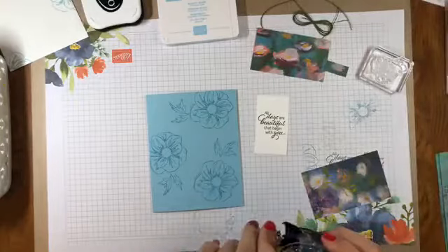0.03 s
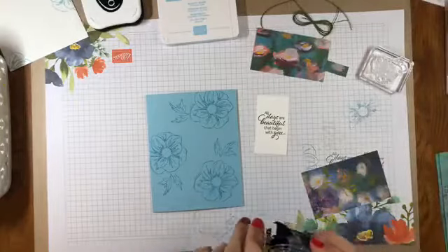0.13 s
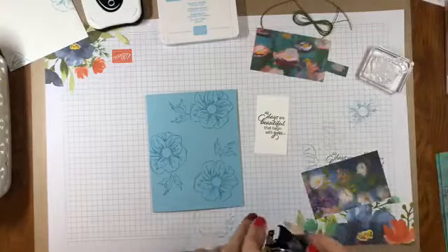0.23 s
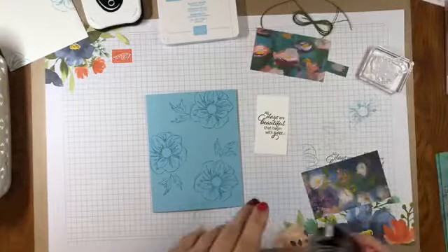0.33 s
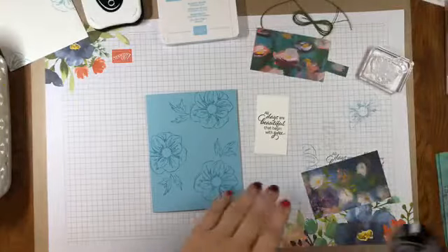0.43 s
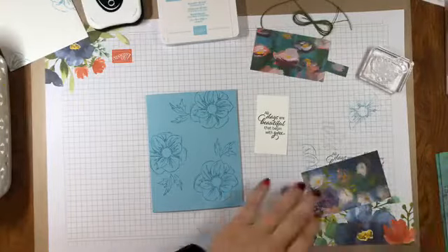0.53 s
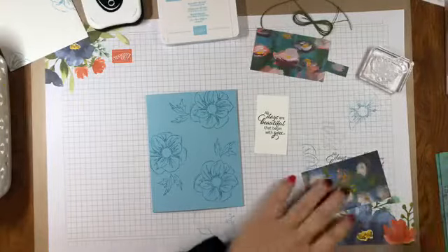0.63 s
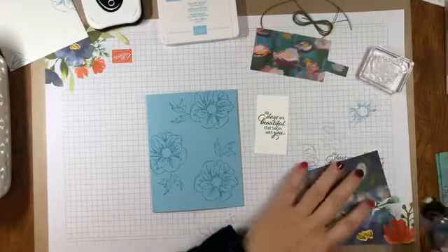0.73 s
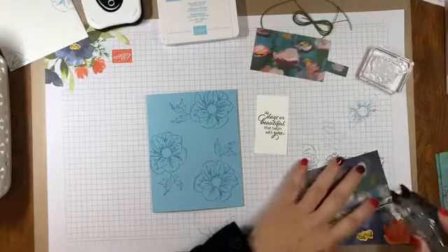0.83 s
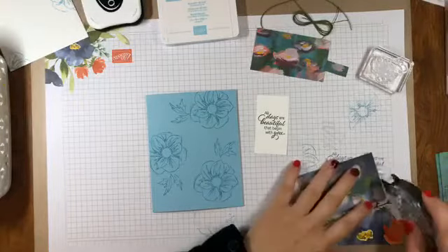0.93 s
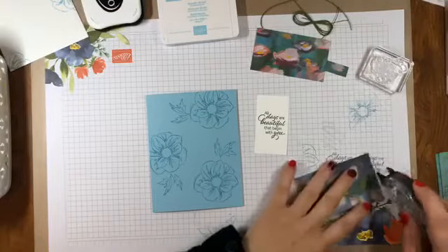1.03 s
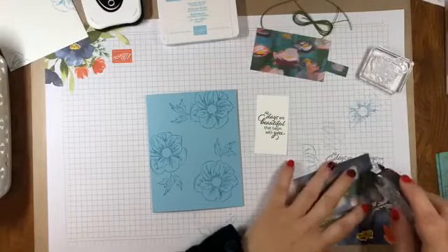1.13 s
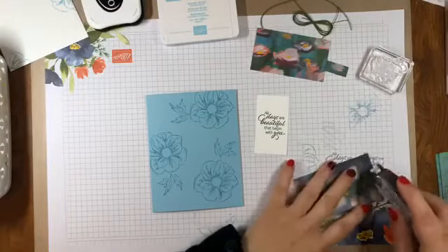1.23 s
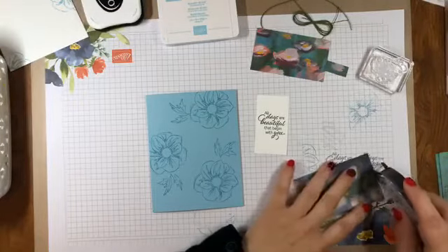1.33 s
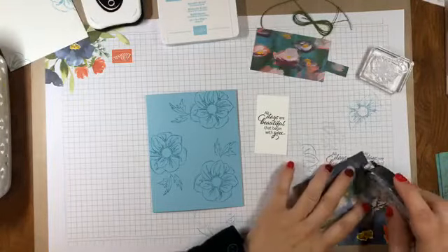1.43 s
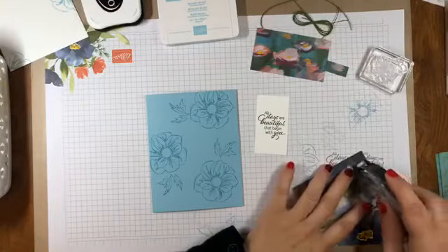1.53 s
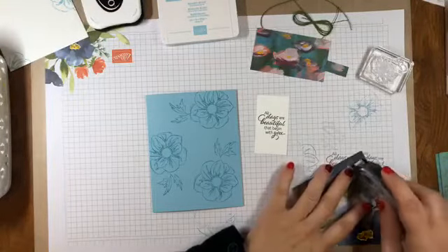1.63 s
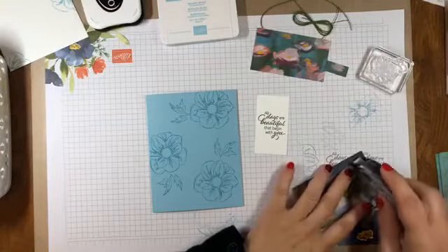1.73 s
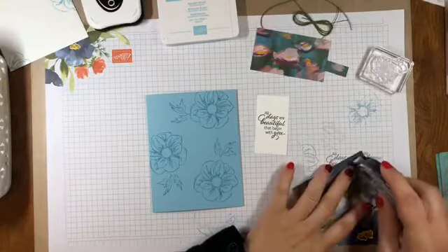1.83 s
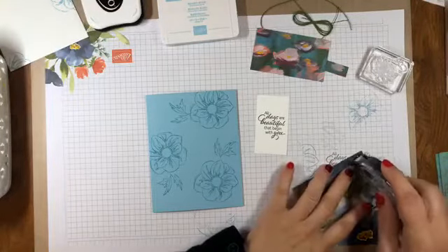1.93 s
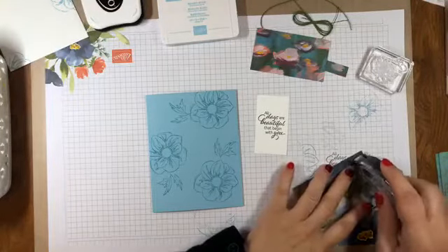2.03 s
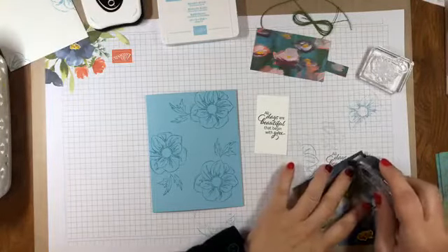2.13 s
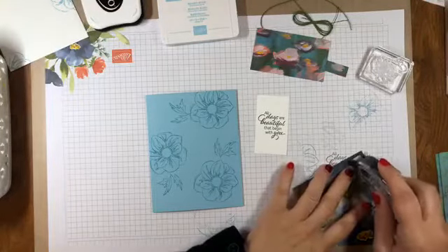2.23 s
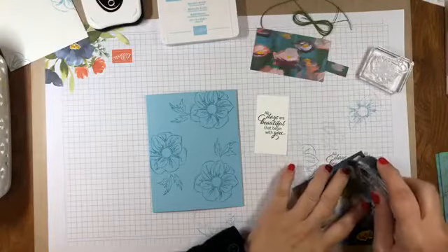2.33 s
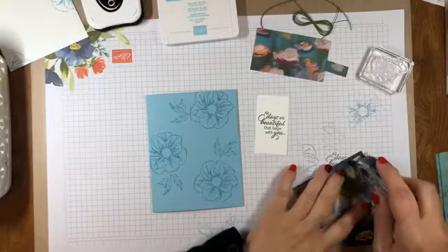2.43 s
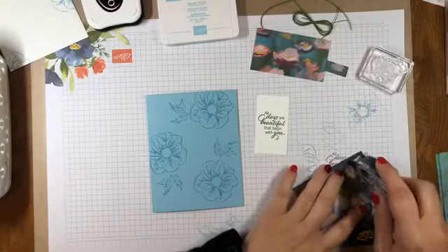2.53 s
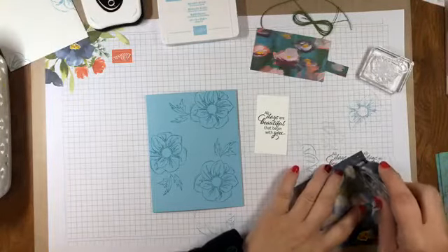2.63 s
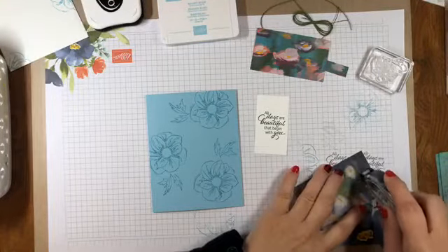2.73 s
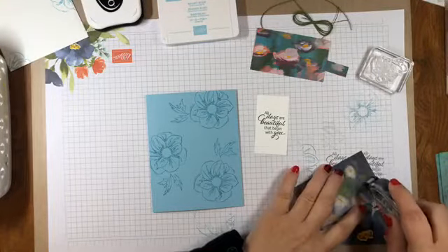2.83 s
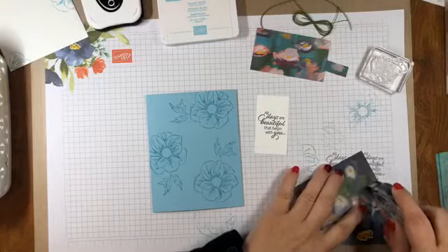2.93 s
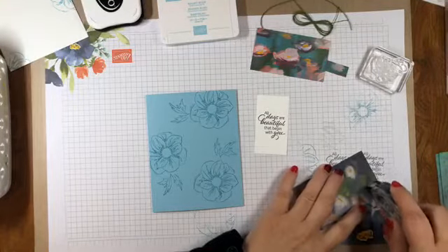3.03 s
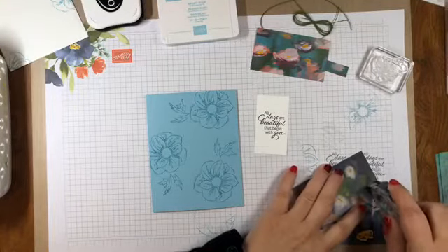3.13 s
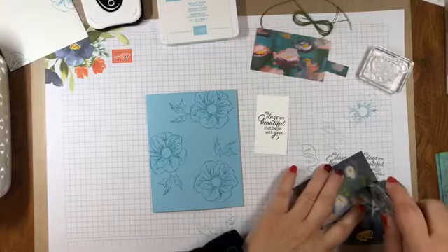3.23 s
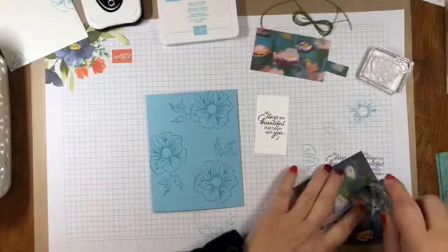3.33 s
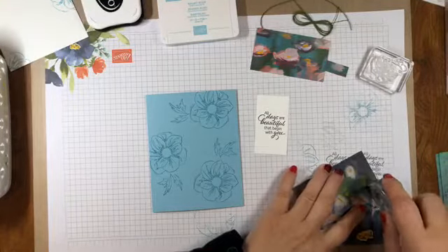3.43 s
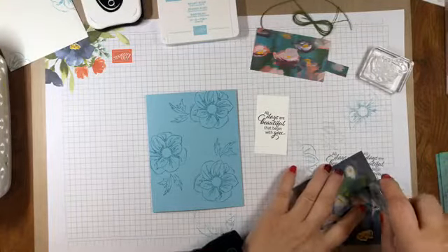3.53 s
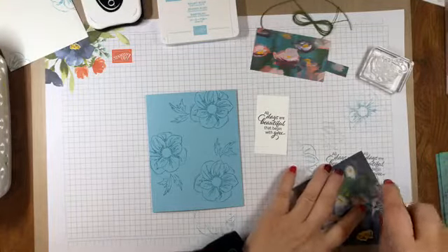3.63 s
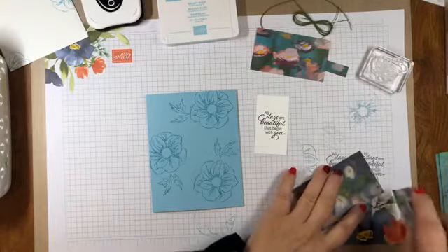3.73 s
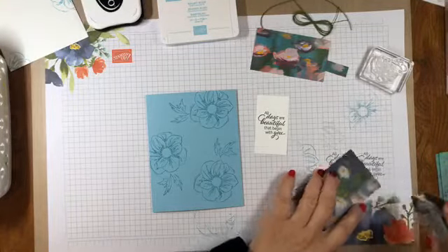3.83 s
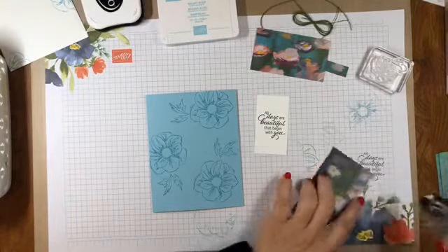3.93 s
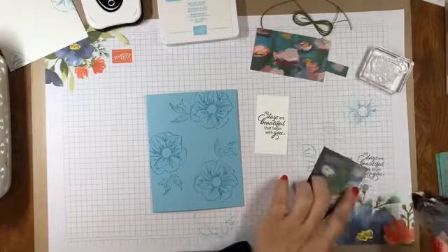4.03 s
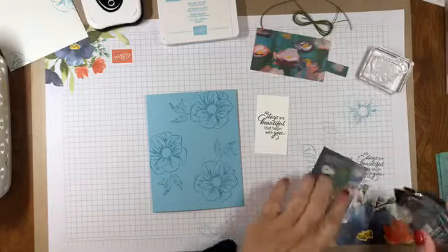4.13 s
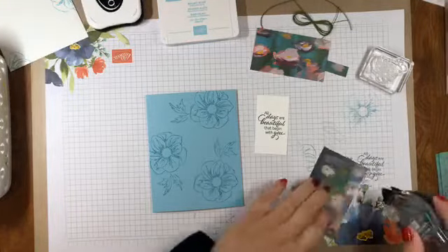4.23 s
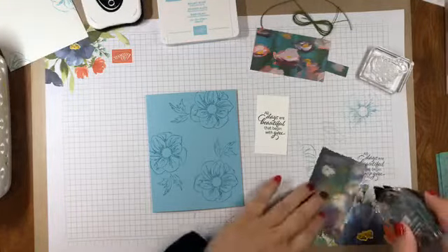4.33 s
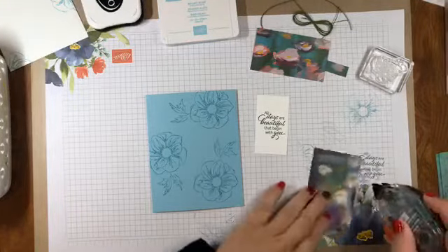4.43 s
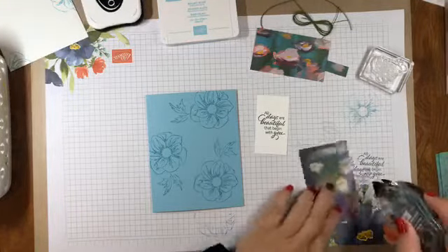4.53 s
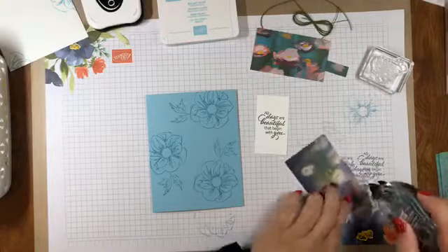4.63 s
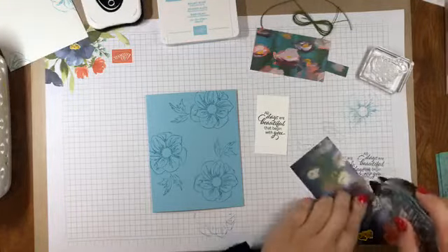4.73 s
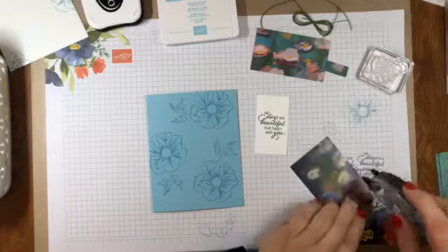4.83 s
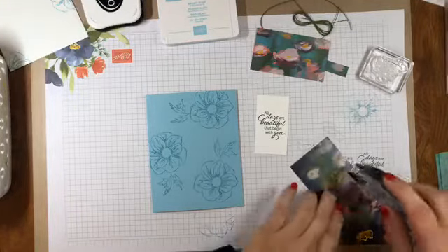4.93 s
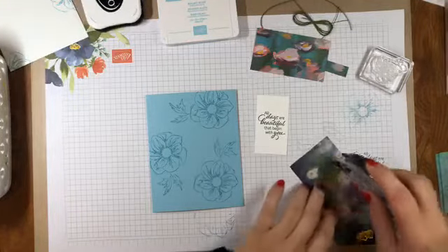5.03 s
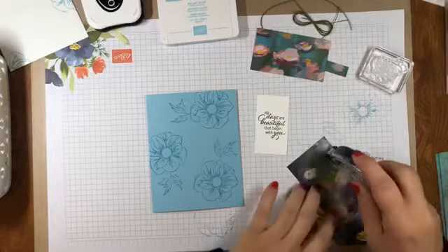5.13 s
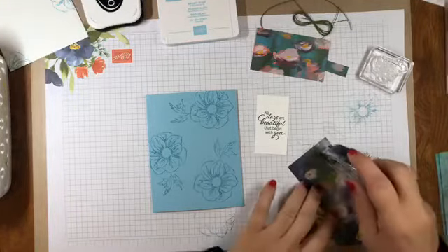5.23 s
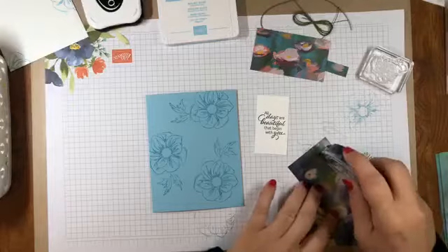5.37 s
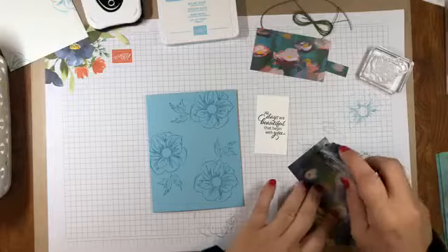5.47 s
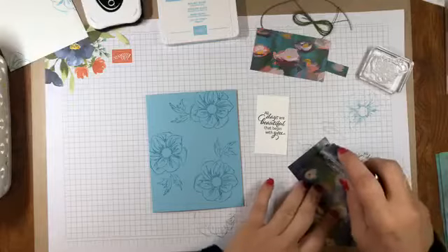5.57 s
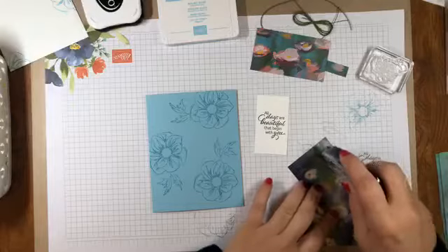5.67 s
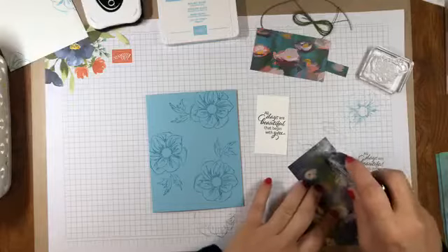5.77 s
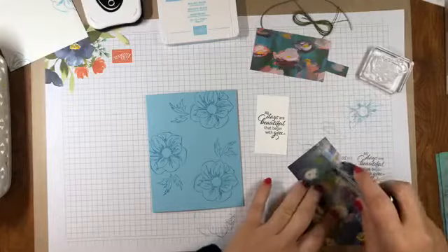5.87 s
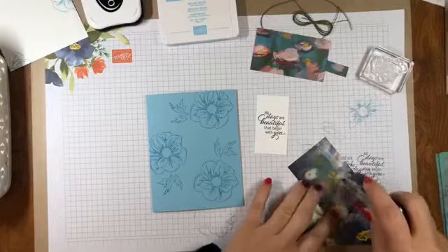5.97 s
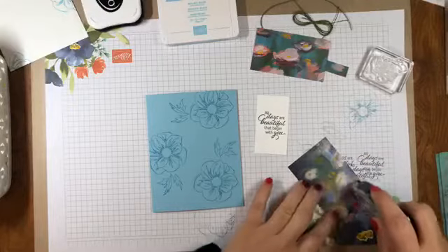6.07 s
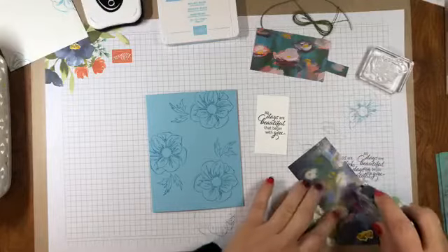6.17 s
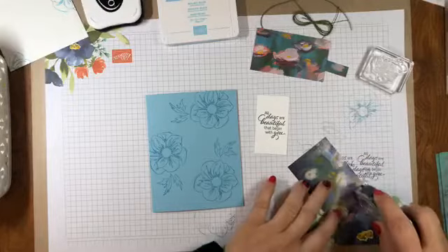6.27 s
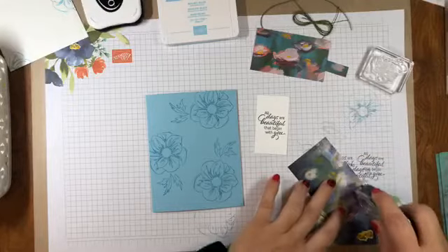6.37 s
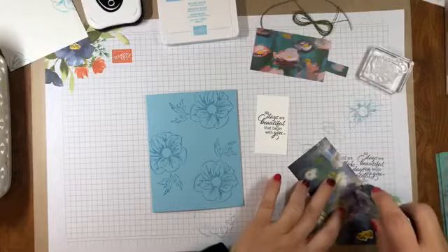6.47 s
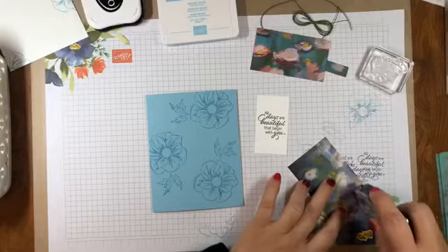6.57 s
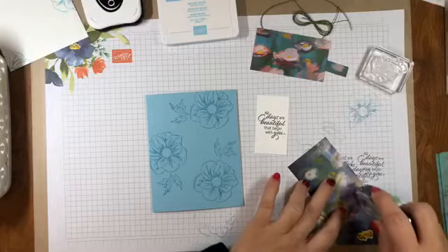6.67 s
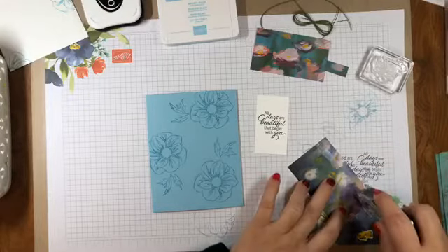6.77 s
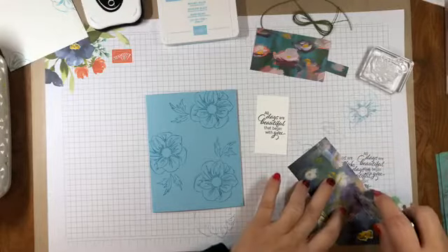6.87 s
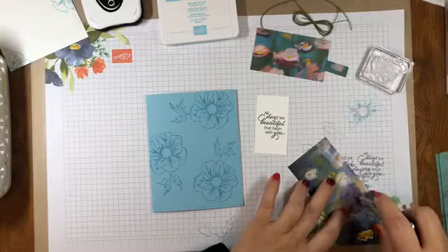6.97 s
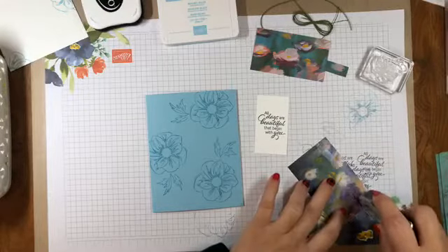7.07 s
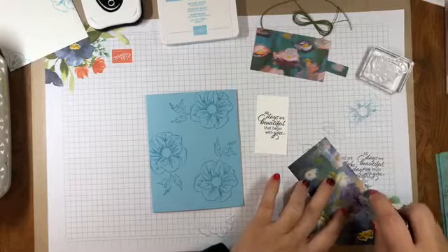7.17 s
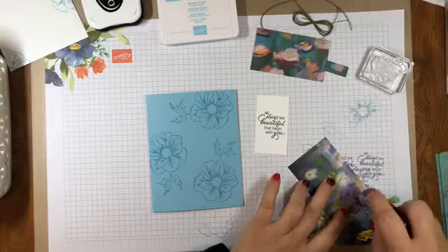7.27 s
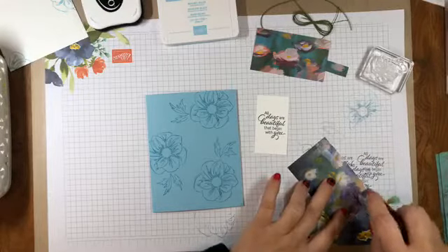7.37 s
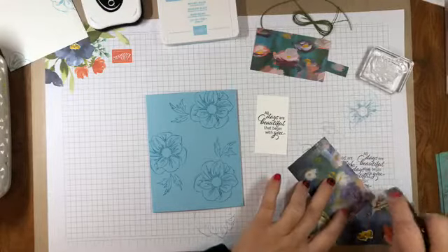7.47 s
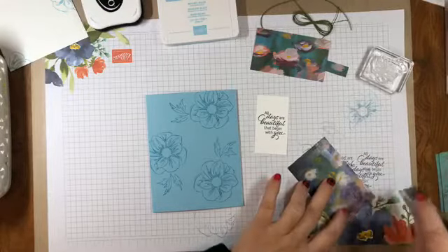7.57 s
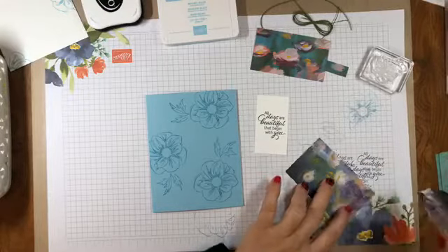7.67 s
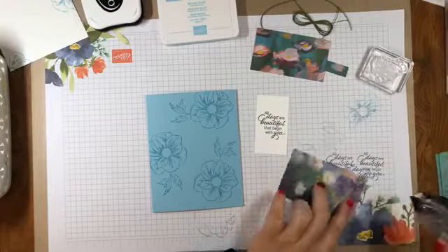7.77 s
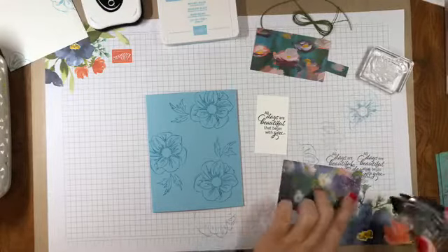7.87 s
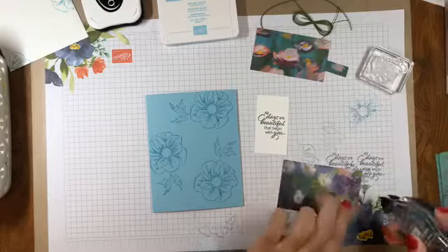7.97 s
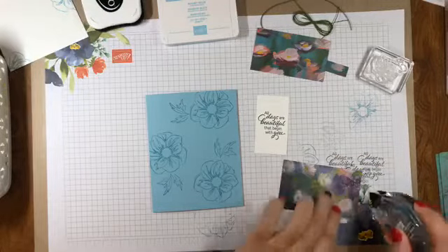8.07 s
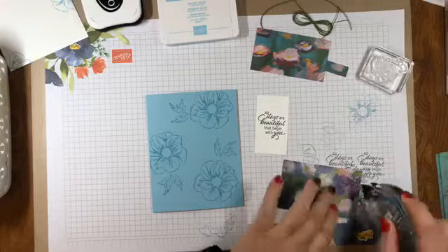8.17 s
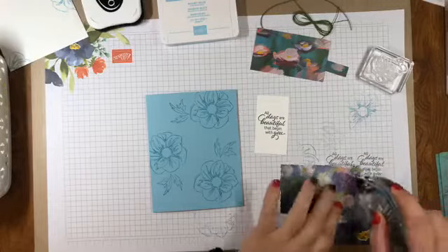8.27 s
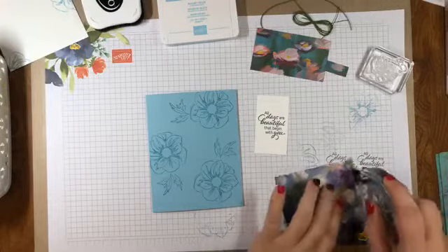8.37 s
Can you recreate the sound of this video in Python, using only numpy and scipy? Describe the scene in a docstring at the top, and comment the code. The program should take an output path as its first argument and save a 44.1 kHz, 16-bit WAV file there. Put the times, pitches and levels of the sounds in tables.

```python
"""A craft table in a small quiet room: a hand-held tape runner rolls over scraps of paper, close up.
In two quick strokes and a few single clicks, its ratchet pawl chatters over each tooth and rings the
plastic shell. Fingers tap the shell, paper hisses and scrapes, the table top thumps.
The room answers with short echoes over a low rumble."""
import sys
import numpy as np
from scipy import signal
from scipy.fft import rfft, irfft
from scipy.io import wavfile
from scipy.ndimage import uniform_filter1d

SR = 44100
rng = np.random.default_rng(int(sys.argv[2]) if len(sys.argv) > 2 else 0)


def to_wav(sig):
    """Store sig (one row per channel, or 1-D mono) as 16-bit WAV at the path in sys.argv[1].

    Samples outside -1..1 are clipped; the rate is SR.
    """
    pcm = np.clip(np.atleast_2d(sig), -1, 1) * 32767
    pcm = np.round(pcm).astype(np.int16)
    wavfile.write(sys.argv[1], SR, pcm.T)  # frames by channels


N = 370440
T = np.arange(N) / SR

# Shell frequency ranges: bright, low, middle, top. Each row: lower edge in Hz, upper edge in Hz.
RANGES_HZ = [(4200, 8500), (650, 2200), (2200, 4200), (8500, 17000)]
# Roller strokes, one list each. Each row: time in seconds, table rumble in dB, tape hiss in dB,
# pawl level in dB in the bright, low and middle range, ring favoured by the grip in Hz.
STROKES = [
    [(2.695, -69, -60, -41, -38.5, -40, 4400), (2.75, -65, -47, -38.5, -43.5, -40, 6300),
     (2.85, -65, -52, -37, -51, -44, 6700), (2.95, -66, -52, -38.5, -52.5, -44, 6800),
     (3.02, -69, -78, -38.5, -49, -42, 6800)],
    [(5.78, -69, -66, -39, -47, -45, 5600), (5.84, -65, -62, -37, -41.5, -41.5, 5500),
     (5.9, -62.5, -56, -42, -44, -46, 5200), (5.97, -61.5, -48, -40, -42.5, -45, 5000),
     (6.05, -62, -53, -38.5, -46, -45, 4900), (6.14, -63, -58, -35, -50, -42, 4900),
     (6.2, -67, -57, -37.5, -47.5, -42.5, 4850), (6.27, -66, -77, -38, -48.5, -44, 4800)],
]


def pawl(chatter_ms=3.8, top_db=-3.5, uneven_db=1.2):
    """The pawl drops once per tooth and rings the shell. Returns sound and power sent to the room."""
    # Roller travel, one list per stroke. Each row: time in seconds, teeth passed.
    travel = [
        [(2.703, 0), (2.7512, 2), (2.7907, 4), (2.844, 7), (2.9287, 11), (2.967, 13), (3, 14)],
        [(5.7797, 0), (5.811, 1), (5.8342, 2), (5.91, 6), (5.9695, 10), (6.0237, 13), (6.0794, 17),
         (6.1127, 19), (6.1886, 23), (6.2134, 24), (6.2477, 25)],
    ]
    # Single drops as the roller creeps. Each row: start in seconds, bright range in dB, low range in dB.
    clicks = [(3.5349, -39.5, -48), (6.7427, -39, -53), (6.788, -39.5, -50), (6.8536, -37.5, -48),
              (6.9243, -38, -52), (7.0577, -42.5, -52), (7.4908, -45, -61), (7.5021, -42.5, -52)]
    stroke_s, _, _, *pawl_columns = np.vstack(STROKES).T
    drops = []
    for stroke in travel:
        time_s, teeth = np.transpose(stroke)
        for start_s in np.interp(np.arange(teeth[-1] + 1), teeth, time_s):
            bright_db, low_db, middle_db, hz = (np.interp(start_s, stroke_s, c) for c in pawl_columns)
            drops.append((start_s, bright_db, low_db, middle_db, [hz]))
    for start_s, bright_db, low_db in clicks:
        drops.append((start_s, bright_db, low_db, bright_db - 4, [3700, 6000]))
    hits = []
    for start_s, bright_db, low_db, middle_db, rings_hz in drops:
        range_db = np.array([bright_db, low_db, middle_db, bright_db + top_db])
        hits.append((start_s, range_db + uneven_db * rng.standard_normal(4), chatter_ms, rings_hz))
    return impacts(hits, tail_ms=1.4, modes_db=13, vary_db=1.3, rings_db=16)


def finger_taps(lift_db=5.5, droop_db_per_oct2=1.5):
    """Fingers tap the shell; harder contacts tilt to the treble. Returns sound and power to the room."""
    # Each row: start in seconds, base level at 3 kHz in dB, tilt in dB per octave, chatter in ms,
    # then one or more favoured rings in Hz.
    taps = [(0.0094, -50, -2.5, 1, 1750, 5000), (0.1053, -34.5, 6.5, 2.4, 1600, 10500),
            (0.2033, -66, 1.5, 4.5, 1650), (0.325, -73, -2, 1.7, 1740), (0.342, -70, -5, 0.88, 1430),
            (0.368, -56.5, -3, 1.6, 1510, 4600), (0.468, -62.5, -2.5, 0.92, 1450),
            (0.5106, -59, -1.5, 2.1, 1050), (0.5672, -56, 2, 4.2, 5400), (0.6444, -72, -6, 1.7, 1090),
            (0.8919, -63, 0.5, 1.9, 2250), (1.867, -73, -0.5, .6, 2300), (1.932, -76, -5, 1.4, 2500),
            (1.985, -71.5, -4, 1.5, 2820), (2.015, -66, 0.5, 5, 1900, 3900), (2.039, -67, -0.5, 3, 6900),
            (2.274, -60.5, 0.5, 3.3, 1470, 4500), (2.4341, -58, -2.5, 2.5, 4030),
            (2.535, -47.5, -6, 0.66, 1840, 3050), (2.676, -70, 1, 1, 4500), (3.505, -70, 2, 1.5, 4000),
            (3.639, -66, -1, 2.4, 1330), (3.689, -60.5, 2, 1.3, 1120), (4.332, -64, 1, 1.1, 1900, 2800),
            (4.399, -66, 4, 1, 8600), (4.8394, -67, 3, 2.1, 3300), (4.921, -68, 2, 2.7, 6470),
            (5.18, -61, 5, 0.41, 3200, 4300, 6300), (5.209, -70, 3, 0.82, 8900),
            (5.2426, -63.5, -7.5, 0.55, 1150, 2500), (5.2816, -70, -2, 0.57, 1360, 4600),
            (5.553, -68, 3, 1, 6500), (5.567, -58, -0.5, 3, 1390, 5000), (6.3922, -70, -4, 1.4, 3680),
            (6.7313, -60, 4, 1.4, 1500, 8200), (7.025, -62, 0.5, 2.3, 4500), (7.2157, -66, -4, 1.2, 1330),
            (7.2535, -66, -7, 1.2, 1500), (7.288, -67, -1, 1.9, 1300), (7.3924, -70, -1.5, 1.5, 1030),
            (7.4335, -72.5, -6, 1.15, 1460), (8.04, -72, -1.5, 1.2, 2100), (8.23, -73, -2, 3, 3300),
            (8.27, -65, 6, 0.65, 1480, 3600)]
    lo_hz, hi_hz = np.transpose(RANGES_HZ)
    octaves = np.log2(np.sqrt(lo_hz * hi_hz) / 3000)
    hits = []
    for start_s, db, tilt, chatter_ms, *rings_hz in taps:
        has_ring = np.any([(lo_hz <= hz) & (hz < hi_hz) for hz in rings_hz], axis=0)
        range_db = db + tilt * octaves - droop_db_per_oct2 * octaves ** 2 + lift_db * has_ring
        hits.append((start_s, range_db, chatter_ms, rings_hz))
    return impacts(hits, tail_ms=0.68, modes_db=-6.5, vary_db=2.6, rings_db=20)


def impacts(hits, tail_ms, **colour):
    """Each hit chatters on the shell. Returns direct sound and, by range, power sent to the room."""
    out, power = np.zeros(N + 1024), np.zeros((4, N))
    for start_s, range_db, chatter_ms, rings_hz in hits:
        i = int(start_s * SR)
        force = chatter(chatter_ms, tail_ms)
        for k, gain in enumerate(undb(range_db)):
            snap = shell(force, k, rings_hz=rings_hz, **colour)
            peak_rms = np.sqrt(uniform_filter1d(snap ** 2, size=88).max())  # loudest 2 ms
            out[i:i + len(snap)] += gain * snap / peak_rms
            power[k, i] += chatter_ms * gain ** 2
    return out[:N], power


def chatter(length_ms, tail_ms, scatter_db=2.6):
    """A few milliseconds of tiny uneven impacts that swell, then die fast."""
    t_ms = np.arange(1024) / SR * 1000
    noise, scatter = rng.standard_normal((2, len(t_ms)))
    attack = np.clip(t_ms / (.25 * length_ms), 0, 1)
    decay = np.exp(-np.maximum(t_ms - length_ms, 0) / tail_ms - .3 * t_ms / length_ms)
    return noise * undb(scatter_db * scatter) * attack * decay


def shell(force, k, modes_db, vary_db=0, rings_hz=(), rings_db=0):
    """Range k of the plastic shell: broad snap, modes in a mix varied by vary_db, favoured rings."""
    # Each row: centre in Hz, width in Hz, relative gain in dB.
    modes = [(980, 250, -13), (1310, 130, -3.5), (1450, 140, -1.5), (1680, 180, -18), (1997, 150, -7),
             (2627, 190, 8.5), (2960, 390, -1), (3660, 340, 1.5), (4600, 410, 3), (5530, 500, -3),
             (6135, 220, 3.5), (6840, 330, -5), (8050, 290, -6.5), (9570, 500, -10), (13500, 2000, -7.5)]
    lo_hz, hi_hz = RANGES_HZ[k]
    out = force.copy()
    for hz, width_hz, db in modes:
        if lo_hz <= hz < hi_hz:
            out += undb(modes_db + db + vary_db * rng.standard_normal()) * ring(force, hz, width_hz)
    for hz in rings_hz:
        if lo_hz <= hz < hi_hz:
            out += undb(rings_db) * ring(force, hz, 0.045 * hz)
    return band(band(out, 0.61 * lo_hz, 1.2 * hi_hz), lo_hz, hi_hz)


def paper_hiss():
    """Fine-grained friction of sliding paper, skin and tape; a slide's treble starts and ends wider."""
    # Each row: frequency in Hz, relative density in dB.
    spectrum = [(880, -10), (1500, -39), (2020, -8.5), (4920, 1.5), (5660, -0.5), (10900, 3), (14900, -2),
                (16000, 3.5)]
    # Each row: peak time in seconds, rise in seconds, fall in seconds, level in dB.
    slides = [(0.51, .04, .04, -66.5), (0.78, 0.1, 0.12, -77), (0.9, 0.021, 0.033, -64.5),
              (0.985, .05, .17, -63), (1.492, 0.051, 0.068, -65), (2.39, 0.024, 0.028, -70.5),
              (3.7, 0.016, 0.042, -66.5), (3.97, 0.15, 0.17, -58.5), (4.42, .03, .05, -60.5),
              (4.63, .2, .17, -55.5), (4.812, 0.044, .05, -54), (5.14, .04, .13, -72),
              (5.76, .04, .025, -73), (6.32, .03, 0.057, -69), (6.39, .016, 0.092, -70.5),
              (7, .05, .06, -69), (7.86, .14, .09, -54), (8.295, 0.043, 0.028, -58.5),
              (8.38, 0.053, .07, -62.5)]
    hiss = coloured(spectrum) * undb(1.1 * walk(rate_hz=70))
    lower = band(hiss, 300, 7000)
    treble = hiss - lower
    sliding = swells(slides, bend=3.3) * lower + swells(slides, bend=3.3, stretch=1.1) * treble
    return sliding + stroke_gain(column=2) * hiss


def scraping():
    """Shell or finger scrapes the sheet: broad noise plus a hum in a moving resonance."""
    # Each row: peak time in seconds, rise in seconds, fall in seconds, level in dB, hum centre in Hz,
    # hum share of the power from 0 to 1.
    scrapes = [(0.02, 0.035, .09, -63.5, 1800, .8), (0.49, .05, .08, -66, 1450, .3),
               (0.85, .2, .06, -73, 1550, .2), (0.91, .03, .25, -69, 1600, .1),
               (2.016, .12, .07, -73, 1960, .3), (2.55, .02, .12, -59, 1850, .7),
               (2.65, .1, .08, -61, 1600, .8), (3.45, .15, .12, -71, 1250, .6),
               (3.702, .015, .07, -61, 1250, .5), (4.0, .2, .18, -75, 1400, .4),
               (4.33, .012, .1, -67, 1800, .1), (4.6, .12, 0.25, -75, 1550, .2),
               (5.25, .012, .1, -69, 1190, .7), (5.45, .15, .12, -78, 1310, .8),
               (5.57, .016, .07, -60, 1300, .5), (5.735, .04, .05, -70, 1340, .1),
               (6.39, .03, .17, -74, 1350, .4), (7.03, .09, .04, -72, 1560, .3),
               (7.22, 0.011, .11, -65.5, 1390, .7), (7.41, .05, .12, -74, 1350, .7),
               (7.88, .17, .1, -72.5, 1530, .2), (8.3, .025, .04, -62, 1420, .8)]
    wobble = band(rng.standard_normal((2, N)), 1, 170)
    phase = 2 * np.pi * np.cumsum(curve(scrapes, column=4)) / SR
    hum = unit(wobble[0] * np.cos(phase) + wobble[1] * np.sin(phase))
    share = curve(scrapes, column=5)
    friction = np.sqrt(share) * hum + np.sqrt(1 - share) * band_noise(420, 3500)
    return swells(scrapes, bend=1.8) * friction


def table_top(push_s=0.0041):
    """Rumble under the pressed roller; damped low modes after each soft blow."""
    # Each row: start in seconds, level in dB, main mode in Hz, its t60 in seconds.
    thumps = [(2.28, -56, 97, 0.25), (2.438, -36.5, 127, 0.12), (4.411, -52.5, 69.2, 0.39),
              (4.481, -55, 59.5, 0.2), (5.566, -52, 80.4, 0.11), (7.503, -56, 330, .05),
              (7.86, -53.5, 202, 0.076)]
    # Each row: frequency ratio, gain in dB, t60 ratio.
    modes = [(.55, -4.5, 1.36), (1.05, 0, 0.7), (1.8, -2, .45)]
    rumble = band_noise(34, 92) + undb(-2.5) * band_noise(130, 490)
    out = stroke_gain(column=1) * rumble
    for start_s, db, base_hz, base_t60_s in thumps:
        t = np.maximum(T - start_s, 0)
        attack = np.clip(t / push_s, 0, 1)
        for hz_ratio, mode_db, t60_ratio in modes:
            envelope = attack * undb(db + mode_db - 60 * t / (t60_ratio * base_t60_s))
            out += envelope * np.sin(2 * np.pi * hz_ratio * base_hz * t)
    return out


def room_echoes(power, build_s=0.00397):
    """Dense echoes of the impacts: build up fast, keep some shell colour, die sooner in the treble."""
    # One row per range. Each row: t60 in seconds, echo gain in dB.
    decays = [(0.17, -16.5), (.2, -12.5), (0.19, -12.5), (0.15, -14)]
    rise = np.exp(-1 / (build_s * SR))
    out = np.zeros(N)
    for k, (t60_s, db) in enumerate(decays):
        fall = 10 ** (-6 / (t60_s * SR))
        echo_power = signal.lfilter([1 - rise], np.convolve([1, -fall], [1, -rise]), power[k])
        wash = unit(shell(rng.standard_normal(N), k, modes_db=4))
        out += undb(db) * np.sqrt(echo_power.clip(0)) * wash
    return out


def room_tone(level_db=-66, sway_db=.6):
    """Low rumble and faint hiss, swaying slowly in level."""
    # Each row: frequency in Hz, relative density in dB.
    spectrum = [(12, -33), (20, -5), (63, -2.5), (86, -13), (244, -16.5), (289, -20), (332, -22.5),
                (794, -27.5), (863, -29), (1240, -28), (1560, -30.5), (3140, -33.5), (9000, -40),
                (16500, -49)]
    return undb(level_db + sway_db * walk(rate_hz=3)) * coloured(spectrum)


def swells(rows, bend, stretch=1, edge_db=28):
    """Gain of swells, edge_db down at stretch times their rise or fall; a higher bend is squarer."""
    out = np.zeros(N)
    for peak_s, rise_s, fall_s, db, *_ in rows:
        near = slice(max(int((peak_s - 4 * rise_s) * SR), 0), int((peak_s + 4 * fall_s) * SR))
        away = np.maximum((peak_s - T[near]) / rise_s, (T[near] - peak_s) / fall_s) / stretch
        out[near] += undb(db - edge_db * away ** bend)
    return out


def stroke_gain(column, edge_s=0.013):
    """Gain from a dB column of STROKES, fading to silence outside each stroke."""
    inside_s = np.max([np.minimum(T - rows[0][0], rows[-1][0] - T) for rows in STROKES], axis=0)
    return np.clip(inside_s / edge_s + 1, 0, 1) * undb(curve(STROKES, column))


def curve(rows, column):
    rows = np.vstack(rows)
    return np.interp(T, rows[:, 0], rows[:, column])


def walk(rate_hz):
    """Smoothed random steps, spread near 1."""
    hold = int(SR / rate_hz)
    steps = np.repeat(rng.standard_normal(N // hold + 1), hold)
    return 1.3 * uniform_filter1d(uniform_filter1d(steps, hold), hold)[:N]


def coloured(spectrum):
    """Noise of rms 1 with the given spectrum."""
    hz, db = np.transpose(spectrum)
    bins_hz = np.maximum(np.arange(N // 2 + 1) * SR / N, 1)
    gain = undb(np.interp(np.log(bins_hz), np.log(hz), db, left=-120))
    return unit(irfft(rfft(rng.standard_normal(N)) * gain, N))


def band_noise(lo_hz, hi_hz):
    return unit(band(rng.standard_normal(N), lo_hz, hi_hz))


def band(x, lo_hz, hi_hz):
    sos = signal.butter(2, [lo_hz, min(hi_hz, .45 * SR)], "band", fs=SR, output="sos")
    return signal.sosfilt(sos, x)


def ring(x, hz, width_hz):
    return signal.lfilter(*signal.iirpeak(hz, hz / width_hz, SR), x)


def unit(x):
    return x / np.sqrt(np.mean(x ** 2))


def undb(db):
    return 10 ** (np.asarray(db, float) / 20)


def scene():
    """Mono mix; only pawl and taps feed the echoes."""
    ratchet, ratchet_power = pawl()
    taps, tap_power = finger_taps()
    echoes = room_echoes(ratchet_power + tap_power)
    return (ratchet + taps + paper_hiss() + scraping() + table_top() + echoes + room_tone())[None]


def record(dry):
    """Steep low-pass at 15.9 kHz."""
    return signal.sosfilt(signal.ellip(10, .2, 70, 15900, fs=SR, output="sos"), dry)


dry = scene()
out = record(dry)
to_wav(out)
```